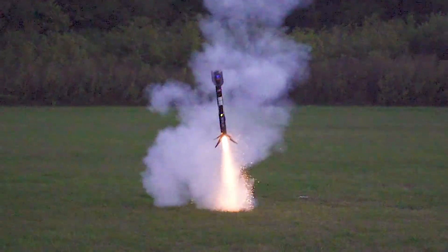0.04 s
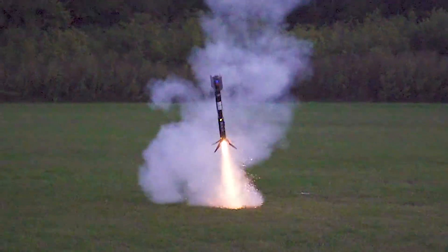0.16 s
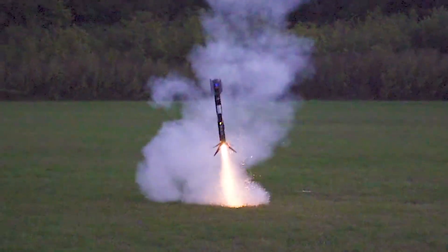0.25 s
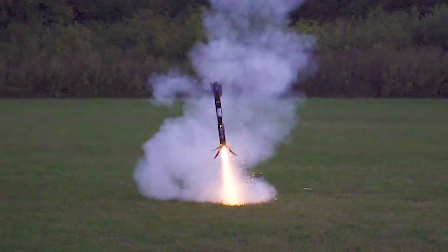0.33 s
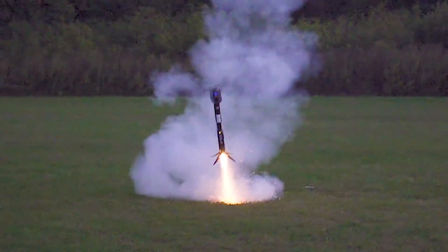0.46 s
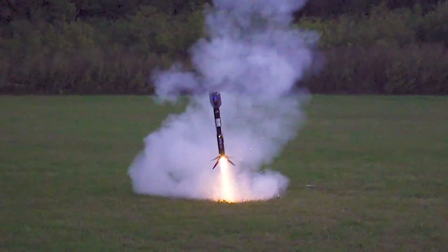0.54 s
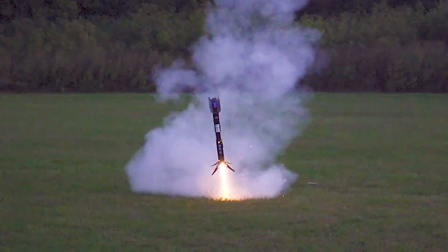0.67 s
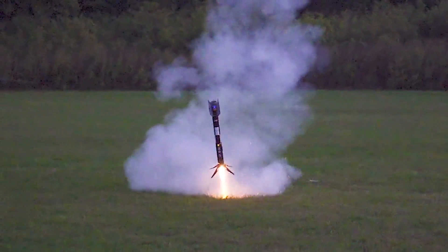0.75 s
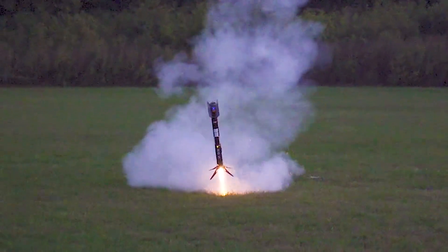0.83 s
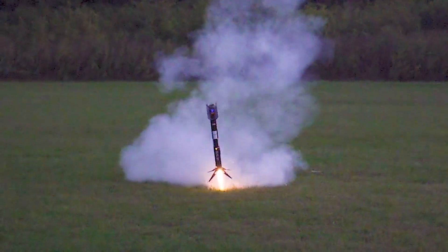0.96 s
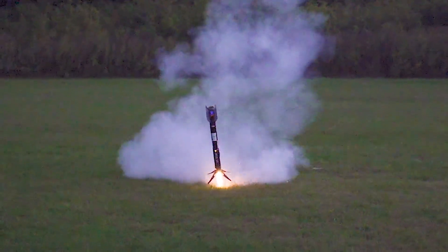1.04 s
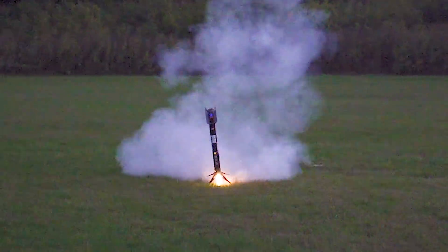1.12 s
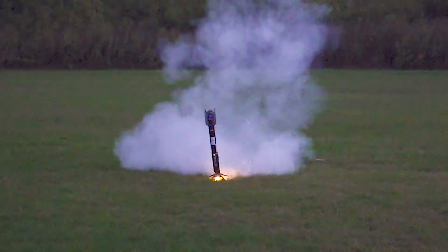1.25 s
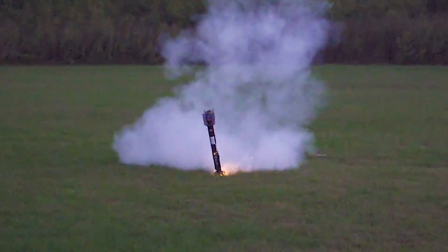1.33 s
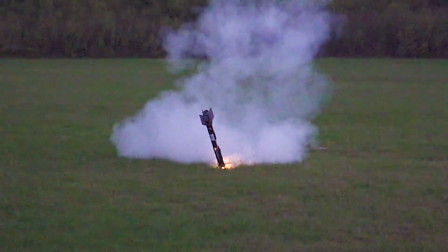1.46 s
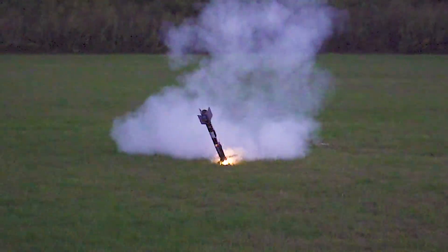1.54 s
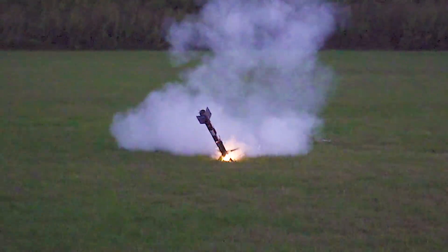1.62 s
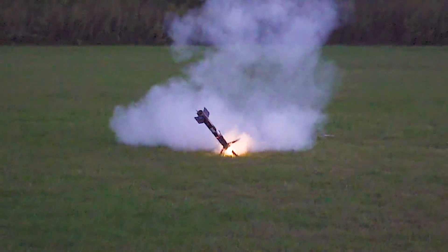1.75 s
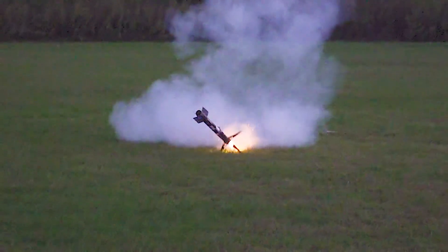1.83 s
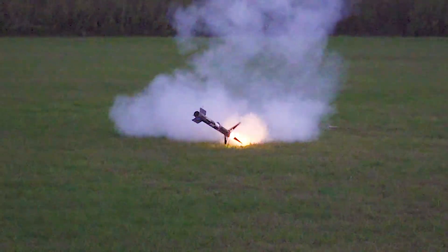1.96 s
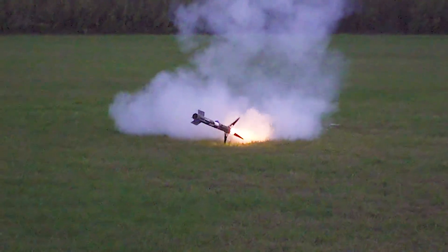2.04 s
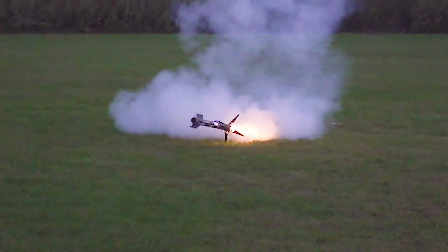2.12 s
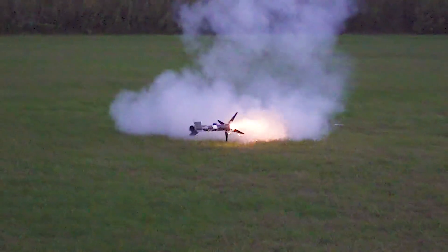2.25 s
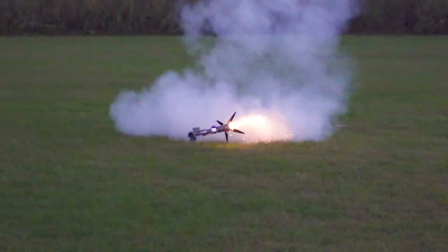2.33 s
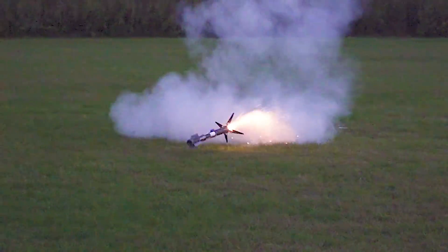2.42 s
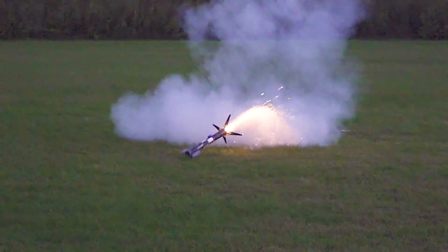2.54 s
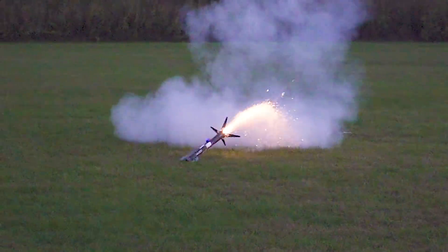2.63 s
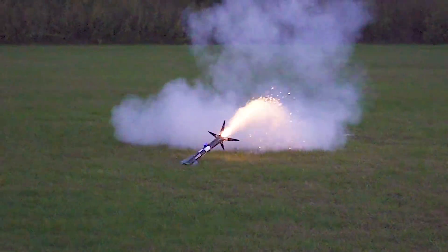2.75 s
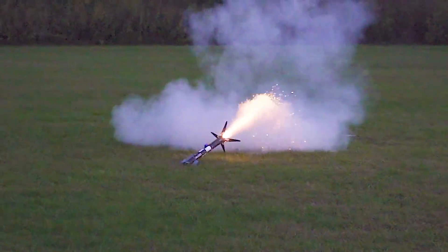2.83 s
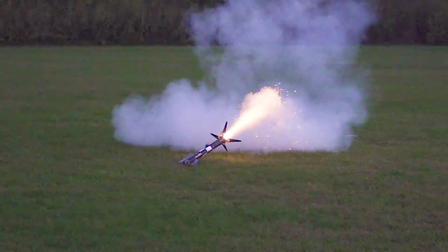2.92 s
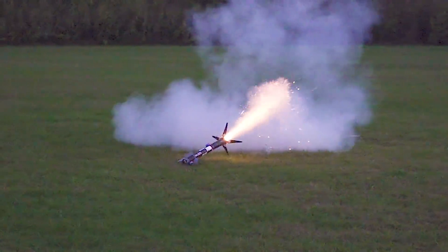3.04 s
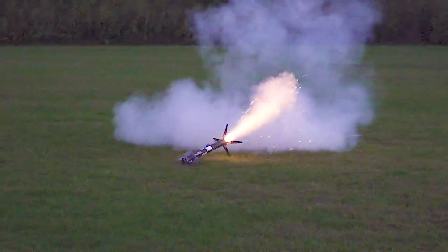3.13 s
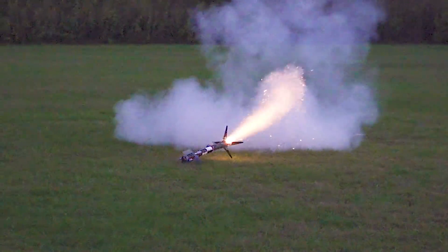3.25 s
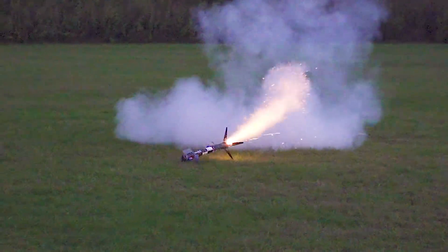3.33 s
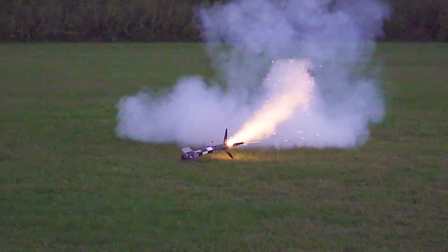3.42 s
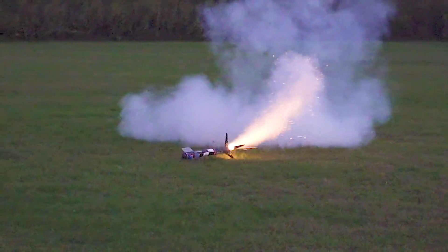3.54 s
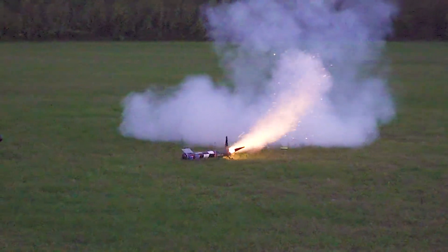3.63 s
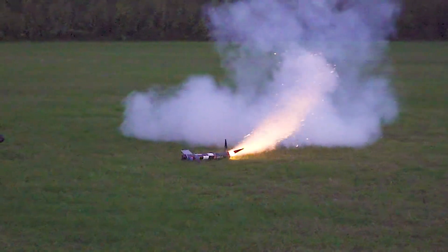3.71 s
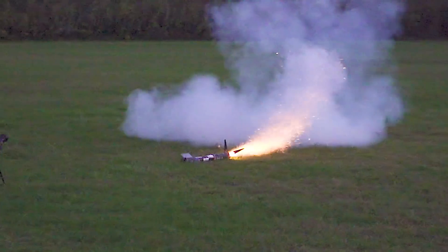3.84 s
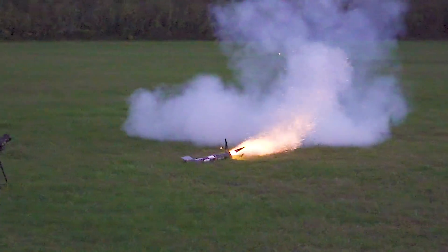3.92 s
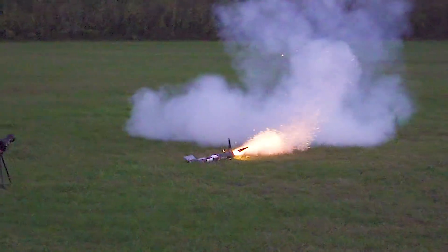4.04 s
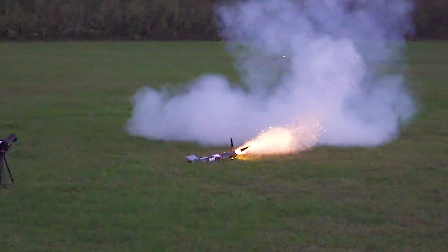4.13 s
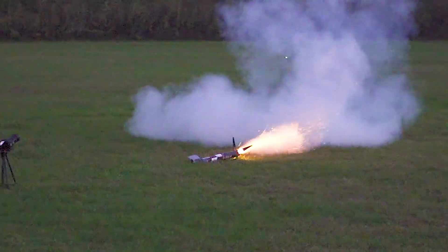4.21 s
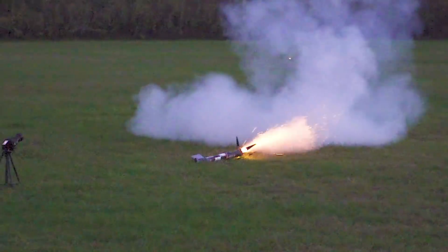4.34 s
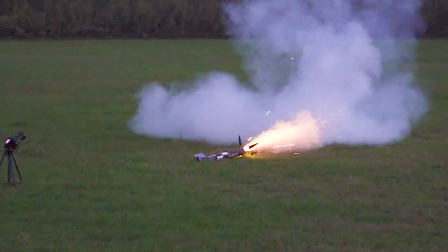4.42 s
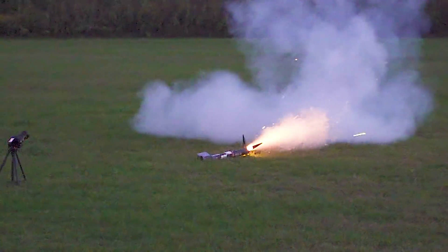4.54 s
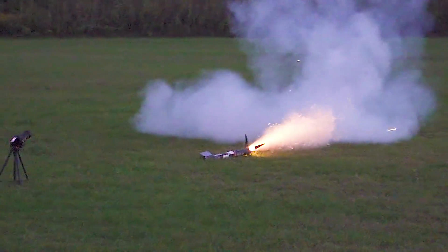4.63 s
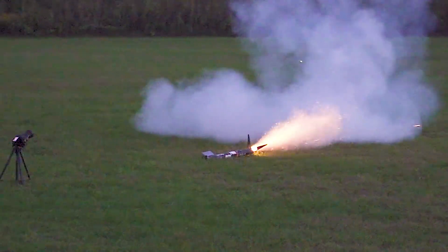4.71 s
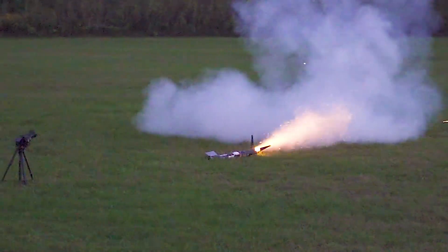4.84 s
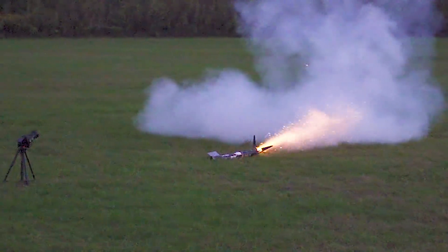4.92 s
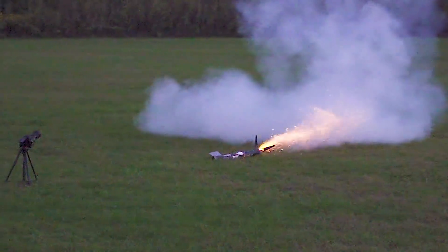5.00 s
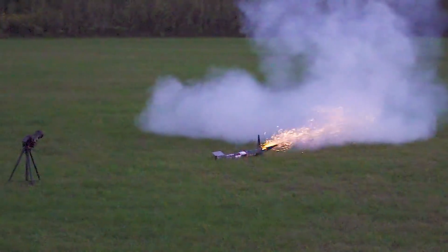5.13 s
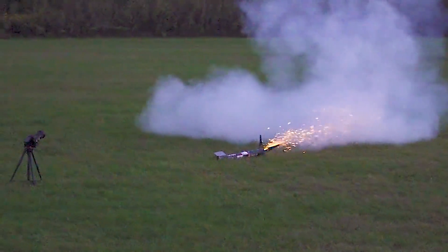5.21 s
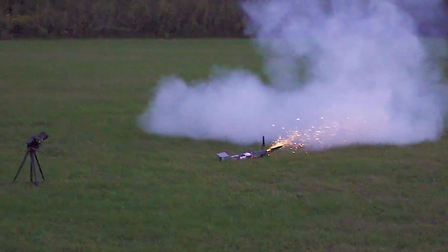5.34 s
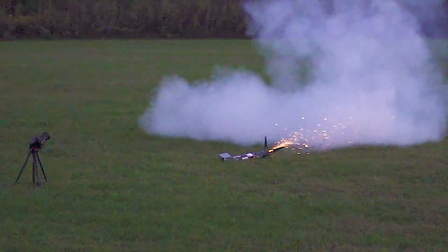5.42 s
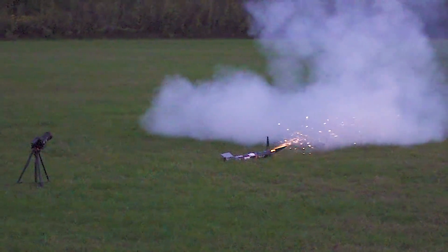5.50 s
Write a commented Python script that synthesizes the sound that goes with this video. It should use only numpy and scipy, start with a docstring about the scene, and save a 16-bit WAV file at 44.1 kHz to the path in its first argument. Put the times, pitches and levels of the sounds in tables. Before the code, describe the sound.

A model rocket motor is already burning on an open grass field, a dense hollow roar over heavy rumble with rapid low thuds. It sinks onto the turf and turns muffled, topples with a brighter crackling roar, then lies rumbling and fluttering in the grass. After about five seconds it cuts out sharply, leaving a very faint fizzle. The distant microphone sounds dull and overloaded, its loudest peaks clipping.

```python
"""A rough roar over a deep rumble: a model rocket motor burns on a mown field, sinks onto its own flame,
topples, lies roaring in the grass, burns out and fizzles on.
Turbulent noise makes the rumble and buffeting; random pressure kicks make the roar, crackle and hiss.
Chuffs are short pressure swings, and the turf cancels a band of the low mids.
A dull, overdriven microphone takes it all."""
import sys
import numpy as np
from scipy import signal
from scipy.fft import rfft, irfft, next_fast_len
from scipy.io import wavfile
from scipy.ndimage import uniform_filter1d

SR = 44100
rng = np.random.default_rng(int(sys.argv[2]) if len(sys.argv) > 2 else 0)


def generate_wav(signal):
    """Clip the signal to [-1, 1] and save it as 16-bit WAV at the path in sys.argv[1]."""
    frames = np.transpose(np.atleast_2d(signal))
    scaled = np.clip(frames, -1, 1) * 32767
    pcm = np.round(scaled).astype(np.int16)
    wavfile.write(sys.argv[1], SR, pcm)


N = 245637

# Attitude of the rocket as it sinks, topples and rolls.
# Each row: time in seconds, tilt from upright in degrees, contact of the nozzle with the grass from 0 to 1.
ATTITUDE = [(0, 5, 0.05), (.6, 4.8, 0), (.88, 6, 0.29), (1.32, 8, 0.43), (1.57, 20, 0.96), (1.72, 35, 0.86),
            (1.95, 55, 0.5), (2.25, 101, 0.18), (2.8, 136, 0.26), (3.4, 114, 0.28), (4.0, 88, 0.37),
            (4.55, 82, 0.24), (5.15, 92, 0.35), (5.57, 92, 0)]
# Loudness while the motor burns, before surges, flutter and the trim of roar and crackle.
# Each row: time in seconds, roar in dB, nozzle crackle in dB, rumble in dB.
LOUDNESS = [(0, -13, -29.5, -9.5), (.68, -14.5, -28, -10.5), (.88, -13.5, -32, -11),
            (1.02, -14, -22.5, -13), (1.2, -23, -31, -13), (1.42, -23.5, -32.5, -11),
            (1.51, -33, -32.5, -14.5), (1.64, -19, -23, -17), (1.87, -14, -25, -10), (2.2, -15, -21.5, -15),
            (2.9, -11, -23.5, -15), (3.55, -13.5, -29.5, -14.5), (4.0, -25, -34.5, -11),
            (4.35, -21.5, -33.5, -12.5), (4.65, -19, -31, -12), (5.0, -23.5, -33.5, -16)]
# Chuffs of the uneven burn. Each row: time in seconds, peak before the turf in dB, pitch in Hz.
CHUFFS = [(0.062, 2.5, 198), (.083, -1, 206), (.101, -1.5, 260), (0.122, 0, 215), (.16, -2.5, 270),
          (0.229, -1, 260), (0.313, -2, 230), (.458, -0.5, 263), (0.548, 0.5, 223), (0.573, 0, 222),
          (0.993, 0, 172), (1.423, 1, 126), (1.776, 0.5, 180), (1.846, 0.5, 182), (2.039, 1, 138),
          (2.149, 0, 115), (2.37, -1.5, 126), (2.526, -2.5, 130), (2.565, -1.5, 113), (2.921, -3.5, 128),
          (3.992, 0.5, 154), (4.084, -0.5, 160), (4.605, 0, 113), (4.854, 3.5, 110), (4.907, 2, 120)]
# Surges, in which the plume billows and buffets.
# Each row: time in seconds, half length in seconds, buffeting gain in dB, rumble gain in dB.
SURGES = [(1.095, .04, 8.5, 2), (1.23, .04, 5.5, 1.5), (2.106, 0.045, 9.5, 1), (2.175, 0.041, -1, 3.5),
          (2.315, .08, 8.5, -0.5), (2.581, 0.045, 10.5, 2), (4.06, 0.072, 1.5, 2), (4.28, 0.03, 6.5, 0),
          (4.42, 0.026, 11, -3), (4.604, 0.03, 8, 0.5), (4.864, 0.053, 13, 2.5)]
# Source spectra of roar, crackle, hiss, rumble and buffeting.
# Each row: frequency in Hz, relative level per Hz in dB.
ROAR_SPECTRUM = [(200, -16), (370, -3), (480, -1), (620, -3), (900, -1.5), (1030, -3.5), (1260, -2),
                 (1470, -8), (1600, -20), (2000, -17), (3000, -41)]
CRACKLE_SPECTRUM = [(700, -14), (1300, -3.5), (1620, -1.5), (1800, -3), (2250, 1), (2600, -1.5), (3000, -5),
                    (4000, -15)]
HISS_SPECTRUM = [(3150, -27.5), (3290, -5), (3450, 3.5), (3640, -1), (3850, -9), (4250, -10.5), (4500, -17)]
RUMBLE_SPECTRUM = [(40, -6), (70, 0.5), (100, 2), (130, 2), (175, 0), (250, 1), (400, -1)]
BUFFET_SPECTRUM = [(10, -11), (22, -5), (45, -1), (65, 3.5), (85, -2.5), (130, -25.5)]

# upper limits of roar and crackle, of the hiss, and of the microphone
ROAR_TOP_HZ, HISS_TOP_HZ, MICROPHONE_TOP_HZ = 3060, 4400, 16000
JET_TRIM_DB = 0.5  # added to roar and crackle
# hollow ring of the free roar, what is added as the jet points down, and a second ring that comes with it
RING_HZ, RING_OCTAVES, RING_DB, RING_DOWN_DB = 777, 0.13, 4, 4
LOW_RING_HZ, LOW_RING_OCTAVES, LOW_RING_DB = 546, .1, 5
# slope of the crackle: free and level, and its loss with the nozzle raised or in the grass
CRACKLE_DB_PER_OCTAVE, RAISED_DB_PER_OCTAVE, SMOTHERED_DB_PER_OCTAVE = 1.5, 28.5, 12.5
# the hiss at a roar of 0 dB, its dB per dB of roar, its loss in the grass and its gain with the nozzle up
HISS_DB, HISS_PER_ROAR, HISS_SMOTHER_DB, HISS_RAISED_DB = -35, 0.7, 20, 10
# edges of the rumble with the plume along the ground, and their rise as it stands up
RUMBLE_LOW_HZ, LOW_RISE_HZ = 86, 35
RUMBLE_HIGH_HZ, HIGH_RISE_HZ = 246.3, 120
BUFFET_DB = -24.5  # between surges
# burnout: the jet dies first, the plume a moment later, and the spent motor fizzles on
JET_OUT_S, JET_FALL_DB_PER_S = 5.035, 125
PLUME_OUT_S, PLUME_FALL_DB_PER_S = 5.134, 124
FIZZLE_ROAR_DB, FIZZLE_CRACKLE_DB, FIZZLE_HISS_DB = -45.5, -65, -80
FIZZLE_RUMBLE_DB, FIZZLE_BUFFET_DB = -42.5, -46.5
# the turf's dip with the nozzle free, its rise and its depth at full contact
DIP_HZ, DIP_RISE_HZ, DIP_DB = 425, 160, 20


def jet():
    """Jet noise: roar, crackle and hiss flutter with the same turbulence."""
    roar_db, crackle_db, _ = curves(LOUDNESS, np.arange(N) / SR)
    flutter = colour(rng.standard_normal(N), [(6, -1.5), (70, -5.5), (180, -1.0)])
    flutter = steady(flutter, span_s=0.42)

    def burn(db, fizzle_db, flutter_db):
        gain = burnout(db, JET_OUT_S, JET_FALL_DB_PER_S, fizzle_db)
        return gain * undb(flutter_db * flutter)

    body = roar() * burn(roar_db + JET_TRIM_DB, FIZZLE_ROAR_DB, flutter_db=0.14)
    body += crackle() * burn(crackle_db + JET_TRIM_DB, FIZZLE_CRACKLE_DB, flutter_db=0.9)
    top = hiss() * burn(hiss_level(roar_db), FIZZLE_HISS_DB, flutter_db=1.0)
    return lowpass(body, ROAR_TOP_HZ) + lowpass(top, HISS_TOP_HZ)


def roar():
    """Shear-layer mixing: dense pressure kicks, most hollow while the free jet points straight down."""
    def ring(f, t):
        down, _, contact = attitude(t)
        main_db = (RING_DB + RING_DOWN_DB * down) * bell(f, RING_HZ, RING_OCTAVES)
        low_db = LOW_RING_DB * down * bell(f, LOW_RING_HZ, LOW_RING_OCTAVES)
        return undb((main_db + low_db) * (1 - contact))

    kicks = colour(eddies(per_s=9000, spread_db=1.0), ROAR_SPECTRUM)
    return steady(sweep(kicks, ring), span_s=0.027)


def crackle():
    """Directivity: small shocks at the nozzle are beamed, so they brighten and dull as it swings."""
    def beam(f, t):
        _, up, contact = attitude(t)
        slope = CRACKLE_DB_PER_OCTAVE - RAISED_DB_PER_OCTAVE * up - SMOTHERED_DB_PER_OCTAVE * contact
        return undb(slope * np.log2(np.clip(f, 1700, 3100) / 2200))

    shocks = colour(eddies(per_s=4500, spread_db=1.0), CRACKLE_SPECTRUM)
    return steady(sweep(shocks, beam), span_s=0.27)


def hiss():
    """Impulsive noise: sparser kicks of uneven size fill a narrow treble band."""
    return steady(colour(eddies(per_s=1300, spread_db=3.0), HISS_SPECTRUM), span_s=0.11)


def hiss_level(roar_db):
    """Absorption by the grass: the hiss follows the roar, smothered in contact and freest in the air."""
    _, up, contact = attitude(np.arange(N) / SR)
    return HISS_DB + HISS_PER_ROAR * roar_db - HISS_SMOTHER_DB * contact + HISS_RAISED_DB * up


def plume(low_order=2.3, high_order=4.6, smothered=0.75):
    """Large-eddy noise: the rumble darkens once the plume lies along the ground."""
    def band(f, t):
        down, up, contact = attitude(t)
        free = 1 - smothered * contact
        low_hz = RUMBLE_LOW_HZ + LOW_RISE_HZ * down * free
        high_hz = RUMBLE_HIGH_HZ + HIGH_RISE_HZ * (down ** 2 + up) * free
        low_edge = 1 + (low_hz / f) ** (2 * low_order)
        high_edge = 1 + (f / high_hz) ** (2 * high_order)
        return 1 / np.sqrt(low_edge * high_edge)

    noise = colour(rng.standard_normal(N), RUMBLE_SPECTRUM)
    return steady(sweep(noise, band), span_s=0.079)


def chuffing(rumble):
    """Monopole pulses: each lump of gas replaces the rumble with a pressure swing of a cycle or two."""
    for s, db, hz in CHUFFS:
        cycles = (np.arange(N) / SR - s) * hz
        lump = np.exp(-2 * cycles ** 2)
        swing = undb(db) * np.cos(2 * np.pi * cycles)
        rumble = (1 - lump) * rumble + lump * swing
    return rumble


def buffeting():
    """Turbulent pressure: the slowest eddies puff as low-frequency noise."""
    return steady(colour(rng.standard_normal(N), BUFFET_SPECTRUM), span_s=0.072)


def surging(t):
    """Unsteady entrainment: the dB that billows of the plume add to the buffeting and to the rumble."""
    s, half_s, buffet_db, rumble_db = np.transpose(SURGES)
    swells = np.exp(-((t[:, None] - s) / half_s) ** 2)
    return swells @ buffet_db, swells @ rumble_db


def burnout(db, out_s, fall_db_per_s, fizzle_db):
    """Exponential decay: a gain follows db, falls away from out_s and leaves a fizzle, summed in power."""
    spent_s = np.maximum(np.arange(N) / SR - out_s, 0)
    return np.hypot(undb(db - fall_db_per_s * spent_s), undb(fizzle_db))


def attitude(t):
    """Projection of the jet axis: how far the nozzle points down, points up and touches grass, each 0-1."""
    tilt, contact = curves(ATTITUDE, t)
    aim = np.cos(np.radians(tilt))
    return np.maximum(aim, 0), np.maximum(-aim, 0), np.clip(contact, 0, 1)


def turf(f, t, octaves=0.16, widen_octaves=.26):
    """Ground interference: the bounce off soft grass cancels a band, deeper, wider, higher in contact."""
    contact = attitude(t)[2]
    dip_hz = DIP_HZ + DIP_RISE_HZ * contact ** 3
    return undb(-DIP_DB * contact * bell(f, dip_hz, octaves + widen_octaves * contact))


def eddies(per_s, spread_db):
    """Shot noise: pressure kicks at random moments, with log-normal sizes; rms 1."""
    chance, size = rng.random(N), rng.standard_normal(N)
    kicks = (chance < per_s / SR) * undb(spread_db * size)
    return (kicks - kicks.mean()) / kicks.std()


def colour(x, points):
    """Spectral shaping: x is weighted by (Hz, dB) points and falls away past both ends."""
    hz, db = np.transpose(points)
    size = next_fast_len(N)
    f = np.maximum(np.arange(size // 2 + 1) * SR / size, 1)
    ends = np.minimum(f / hz[0], 1) ** 2 * np.minimum(hz[-1] / f, 1) ** 2
    shape = ends * undb(np.interp(np.log(f), np.log(hz), db))
    return irfft(rfft(x, size) * shape, size)[:N]


def sweep(x, gain):
    """Time-varying filtering: gain(Hz, s) weights each short-time spectrum."""
    f, t, frames = signal.stft(x, SR, nperseg=2048)
    return signal.istft(frames * gain(np.maximum(f, 1)[:, None], t), SR)[1][:N]


def steady(x, span_s):
    """Power normalisation: the rms is held near 1 over span_s, leaving the quicker flutter."""
    size = max(int(span_s * SR), 1)
    power = uniform_filter1d(uniform_filter1d(x ** 2, size), size)
    return x / np.sqrt(power + 1e-12)


def lowpass(x, hz):
    """Band limiting: a steep elliptic filter removes what lies above hz."""
    return signal.sosfilt(signal.ellip(14, .1, 100, hz, fs=SR, output="sos"), x)


def bell(f, hz, octaves):
    """Resonance shape: a Gaussian on an octave scale, 1 at its centre."""
    return np.exp(-.5 * (np.log2(f / hz) / octaves) ** 2)


def undb(db):
    """Logarithmic level: decibels to amplitude gain."""
    return 10 ** (np.asarray(db) / 20)


def curves(table, t):
    """Linear interpolation: the columns of a table at the times t."""
    s, *columns = np.transpose(table)
    return [np.interp(t, s, c) for c in columns]


def scene():
    """Superposition: the motor is heard across the turf, the buffeting without its dip."""
    t = np.arange(N) / SR
    buffet_surge_db, rumble_surge_db = surging(t)
    buffet_db = BUFFET_DB + buffet_surge_db
    rumble_db = curves(LOUDNESS, t)[2] + rumble_surge_db
    buffet_gain = burnout(buffet_db, PLUME_OUT_S, PLUME_FALL_DB_PER_S, FIZZLE_BUFFET_DB)
    rumble_gain = burnout(rumble_db, PLUME_OUT_S, PLUME_FALL_DB_PER_S, FIZZLE_RUMBLE_DB)
    buffet = buffeting() * buffet_gain
    motor = chuffing(plume() * rumble_gain) + jet()
    return (buffet + sweep(motor, turf))[None]


def record(dry):
    """Overload: the microphone cuts the tallest peaks flat, so they tick, and loses the highest treble."""
    return lowpass(np.clip(dry, -1, 1), MICROPHONE_TOP_HZ)


dry = scene()
out = record(dry)
generate_wav(out)
```